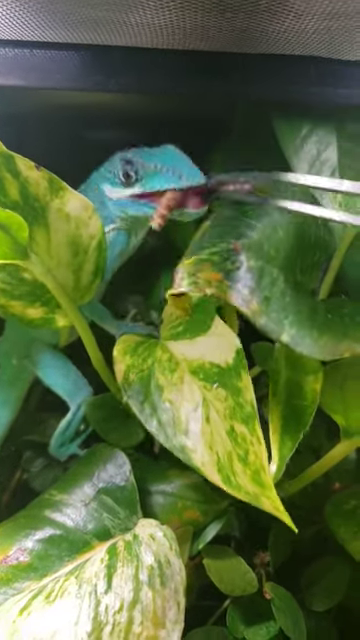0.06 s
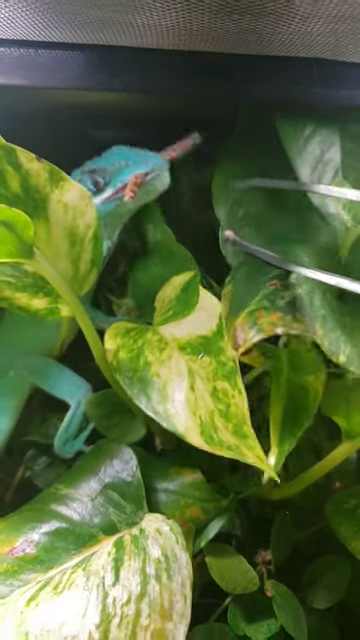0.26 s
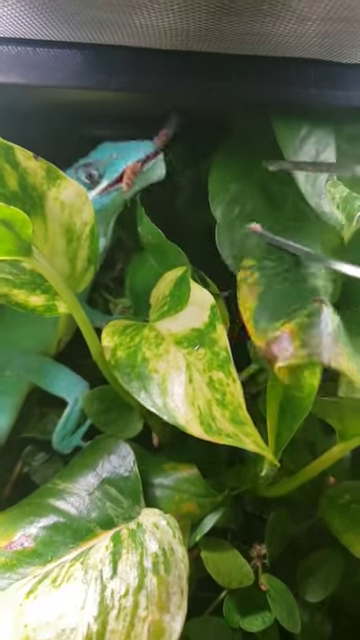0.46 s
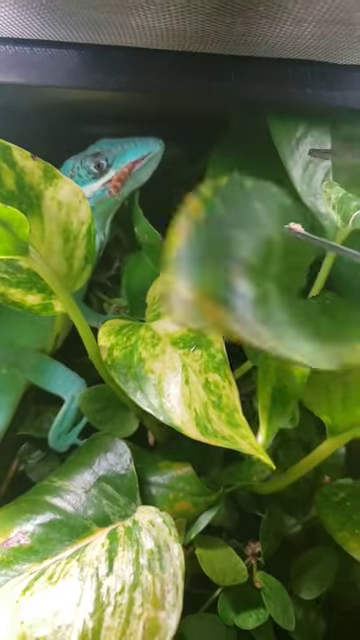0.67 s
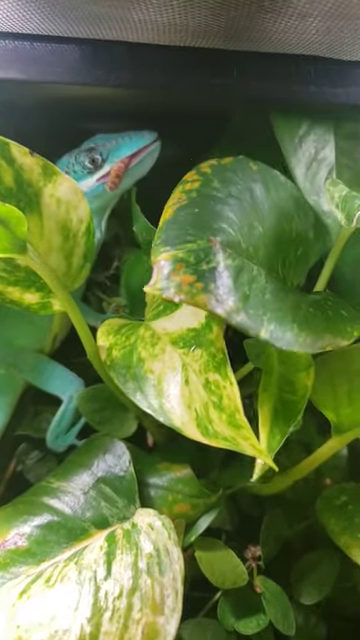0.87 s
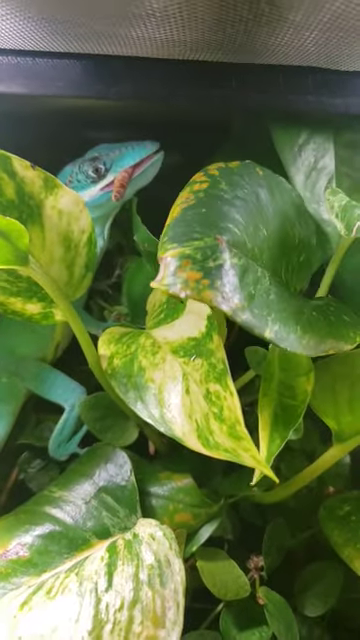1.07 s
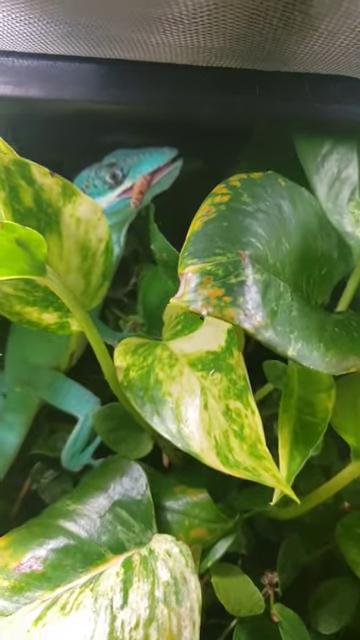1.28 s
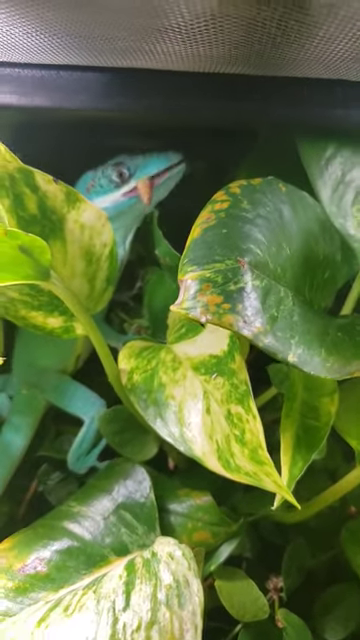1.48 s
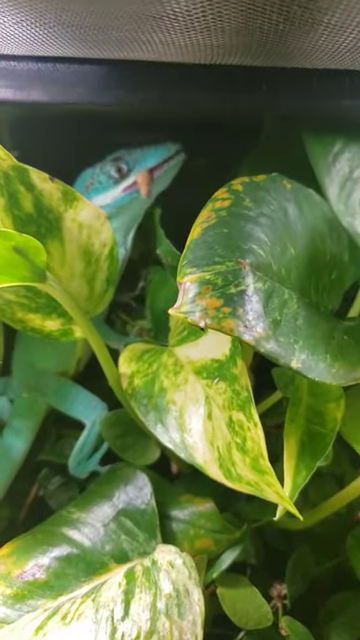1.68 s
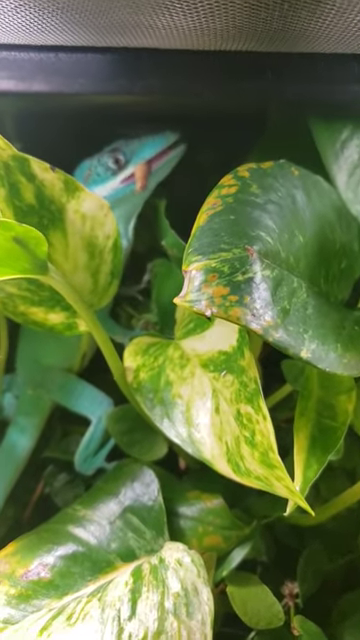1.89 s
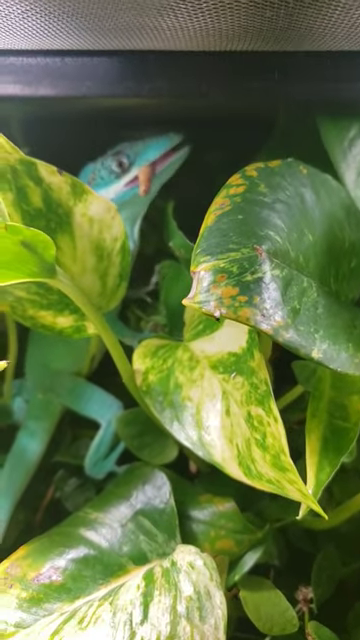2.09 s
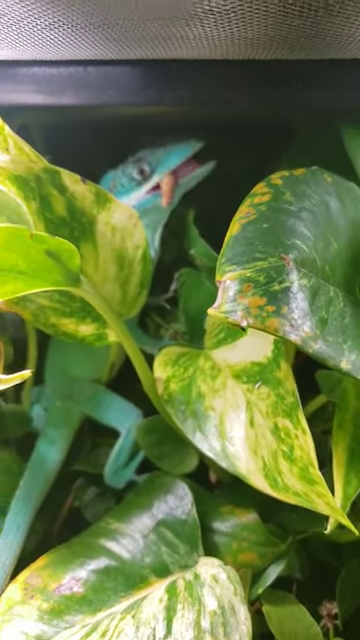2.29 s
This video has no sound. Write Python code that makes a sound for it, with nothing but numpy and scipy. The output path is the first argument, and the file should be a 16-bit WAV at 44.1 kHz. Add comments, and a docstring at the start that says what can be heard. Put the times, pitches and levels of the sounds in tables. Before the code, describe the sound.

Close leaves swish as tongs draw back through them, then thin to small crackles and snaps.

```python
"""At a glass enclosure in a faintly humming room, stereo microphones close to the leaves.
Metal tongs draw back through the foliage while a lizard takes its food. Leaf slides over leaf in
tiny slips that swish and fizz; bent leaves spring back with papery flicks. Sharp snaps and fine
crackle sound brighter on the right, and a few soft bumps swing a panel in the middle.
The glass walls add a quick flutter and a faint ring."""
import sys
import numpy as np
from scipy import signal
from scipy.fft import rfft, irfft
from scipy.io import wavfile
from scipy.ndimage import uniform_filter1d

SR = 44100
rng = np.random.default_rng(int(sys.argv[2]) if len(sys.argv) > 2 else 0)


def wrap_up_sound(samples):
    """Save the sound to the file named by the first command line argument, as 16-bit audio."""
    columns = np.atleast_2d(samples).T
    # keep every value between -1 and 1, then stretch to whole-number steps
    tamed = np.clip(columns, -1, 1)
    steps = np.round(tamed * 32767).astype(np.int16)
    wavfile.write(sys.argv[1], SR, steps)


N = 108045


def amp(db):
    return 10 ** (np.asarray(db) / 20)


def unit_rms(x):
    return x / np.sqrt(np.mean(x ** 2) + 1e-20)


def over_pitch(points, hz, column=1):
    """Reads a table along a log-frequency axis."""
    table = np.array(points, float)
    return np.interp(np.log(hz + 1), np.log(table[:, 0] + 1), table[:, column])


def over_time(points, column):
    table = np.array(points, float)
    return np.interp(np.arange(N) / SR, table[:, 0], table[:, column])


def colour(x, points):
    """Filters by a spectrum that falls away below its first point."""
    size = x.shape[-1]
    hz = np.fft.rfftfreq(size, 1 / SR)
    low_cut = np.minimum(hz / points[0][0], 1) ** 2
    return irfft(rfft(x) * amp(over_pitch(points, hz)) * low_cut, size)


def pan(db):
    """Constant-power gains for a balance: left microphone minus right, in dB."""
    gains = np.array([amp(db / 2), amp(-db / 2)]).reshape(2, -1)
    return gains / np.sqrt(np.mean(gains ** 2, axis=0))


def add(mix, start_s, sound):
    start = round(start_s * SR)
    sound = sound[:, max(-start, 0):]
    part = mix[:, max(start, 0):][:, :sound.shape[1]]
    part += sound[:, :part.shape[1]]


# Room tone behind the enclosure: (frequency [Hz], relative level [dB])
ROOM_SPECTRUM = [(20, -15), (40, -9.5), (60, 2), (85, -8), (130, -11), (190, -16), (255, -15.5),
                 (340, -19.5), (520, -20.5), (800, -24.5), (1400, -29), (3000, -33.5), (5500, -43.5),
                 (7000, -51), (8400, -42), (12500, -29.5), (14300, -30), (15550, -34), (15900, -72)]
# The room across the two microphones: (frequency [Hz], balance [dB], correlation [0-1])
ROOM_STEREO = [(58, 3, 0.6), (270, 2, 0.67), (700, 2.5, 0.3), (1970, 2, 0), (6730, -5, 0.1),
               (10700, 15.5, 0), (14400, -15, 0.11)]
# Wavering background hum: (pitch [Hz], level [dB], half width [Hz])
HUM_LINES = [(60.8, -75.5, 0.87), (110, -102.5, 6.2), (501, -88, 2.6), (779, -91.5, 12)]
# Faint swells in the background: (time [s], drone level [dB], rumble level [dB], hiss level [dB])
ROOM_SWELLS = [(0, -84, -94, -97), (.35, -85.5, -70.5, -74), (.48, -75.5, -74.5, -86),
               (.82, -81.5, -67, -91), (.95, -77, -104, -80), (1.12, -77.5, -73, -82),
               (1.25, -95, -88, -73), (1.6, -86, -68.5, -86), (2.2, -97, -80.5, -96), (2.33, -98, -89, -75),
               (2.45, -88, -94, -77)]


def room_tone():
    """Behind the leaves: steady air and hum, with a drone, rumble and hiss that come and go."""
    hz = np.fft.rfftfreq(N, 1 / SR)
    balance = pan(over_pitch(ROOM_STEREO, hz))
    correlation = over_pitch(ROOM_STEREO, hz, column=2)
    low_cut = np.minimum(hz / 52, 1) ** 2

    def stereo_noise(gain):
        left, independent = rfft(rng.standard_normal((2, N)))
        right = correlation * left + np.sqrt(1 - correlation ** 2) * independent
        return unit_rms(irfft(np.array([left, right]) * gain * low_cut * balance, N))

    def band(centre_hz, half_width_hz):
        return stereo_noise(1 / (1 + ((hz - centre_hz) / half_width_hz) ** 2))

    hum = sum(amp(db) * band(pitch_hz, half_width_hz) for pitch_hz, db, half_width_hz in HUM_LINES)
    drone = amp(over_time(ROOM_SWELLS, 1)) * band(centre_hz=251.5, half_width_hz=35)
    rumble = amp(over_time(ROOM_SWELLS, 2)) * band(centre_hz=62.4, half_width_hz=22)
    hiss = amp(over_time(ROOM_SWELLS, 3)) * band(centre_hz=14400, half_width_hz=820)
    air = amp(-71) * stereo_noise(amp(over_pitch(ROOM_SPECTRUM, hz)))
    return air + hum + drone + rumble + hiss


def slips(per_s, spread_db, decay_s):
    """A random train of tiny slips of uneven size, each a puff of noise."""
    onsets = rng.random(N) < per_s / SR
    sizes = amp(spread_db * np.minimum(rng.exponential(1, N), 4))
    power = signal.lfilter([1], [1, -np.exp(-1 / (decay_s * SR))], (onsets * sizes) ** 2)
    return np.sqrt(power) * rng.standard_normal((2, N))


def catch_and_slip(depth_db, step_s):
    """A gain that jumps as the leaves catch and slip in short clumps."""
    knots = np.arange(0, N, step_s * SR)
    jumps = rng.standard_normal(N)[:len(knots)]
    return amp(depth_db * np.interp(np.arange(N), knots, jumps))


def bending(x, depth_db):
    """Resonances drift as the leaves bend and touch in new places."""
    spectra = signal.stft(x, nperseg=256)[2]
    _, bins, frames = spectra.shape
    patches = rng.standard_normal((frames, bins))  # the same at both microphones
    patches = uniform_filter1d(patches, size=9, axis=0)
    patches = uniform_filter1d(patches, size=3, axis=1)
    return signal.istft(spectra * amp(depth_db * unit_rms(patches).T), nperseg=256)[1][:, :N]


# Leaves brushing, close up: (time [s], relative swish level [dB], relative fizz and crackle level [dB])
BRUSHING = [(0, -70.5, -57), (0.09, -70.5, -65), (0.104, -54, -48.5), (0.13, -71, -64.5), (0.158, -65, -58),
            (0.175, -68.5, -57), (0.226, -61.5, -54.5), (0.244, -52, -44), (0.268, -59.5, -54.5),
            (0.3, -60, -55), (0.325, -51.5, -46.5), (0.35, -56.5, -57.5), (0.375, -55, -47.5),
            (0.413, -76, -62), (0.43, -66, -52.5), (0.51, -73.5, -63), (0.555, -74.5, -61),
            (0.605, -59.5, -56), (0.648, -70, -64.5), (0.72, -59.5, -45), (0.75, -60, -51),
            (0.805, -68.5, -65.5), (0.838, -56, -50.5), (0.858, -69, -64), (0.895, -64, -62.5),
            (0.93, -67.5, -66), (0.96, -77, -67), (1.04, -72.5, -66.5), (1.13, -78.5, -67),
            (1.29, -81.5, -73.5), (1.39, -79.5, -70.5), (1.47, -71.5, -63), (1.61, -73.5, -64.5),
            (1.67, -80, -71.5), (1.765, -73, -63), (1.8, -76, -68.5), (1.96, -75, -69), (2.075, -85, -74),
            (2.09, -72, -58), (2.112, -68, -60), (2.135, -81, -74.5), (2.172, -52.5, -62),
            (2.186, -65.5, -85), (2.24, -77, -77), (2.28, -85.5, -77)]
# The brushing across the two microphones: (time [s], swish balance [dB], fizz balance [dB])
LEAF_BALANCE = [(0, 2, -17), (.3, 4.5, -1), (.53, 2.5, -11), (.61, 7, -5), (.72, 3.5, -1), (.93, 2, -6),
                (1.15, 5, -20), (1.6, 3, 1.5), (2.1, 1, -25), (2.3, 6, -8)]
# The broad swish, a little to the left: (frequency [Hz], relative level [dB])
SWISH_SPECTRUM = [(300, -11.5), (1100, -14), (2100, -10), (2900, -4), (3700, -4.5), (5000, -3), (7000, 3.5),
                  (8300, -5.5), (11000, -23)]
# The high fizz, mostly to the right: (frequency [Hz], relative level [dB])
FIZZ_SPECTRUM = [(3000, -47.5), (6000, -40.5), (8300, -20.5), (9800, -12), (11000, 1.5), (12200, -4.5),
                 (13300, -0.5), (14500, 0.5), (15300, -1.5), (15600, 0), (15900, -21.5)]
# Crackle and snap treble, with the right microphone's ringing emphasis:
# (frequency [Hz], relative level [dB])
CRISP_SPECTRUM = [(3000, -29), (6000, -29.5), (8200, -17), (9500, -5), (11000, -3), (11600, -3.5),
                  (12100, 5), (13400, -4), (14300, 6), (15300, -1.5), (15650, -10), (16000, -18),
                  (16500, -36)]


def brushing_leaves():
    """Leaf slides over leaf: dense slips make the swish and fizz, sparse ones the crackle."""
    rub = slips(per_s=5000, spread_db=3, decay_s=0.00068) * catch_and_slip(depth_db=2.5, step_s=0.006)
    ticks = slips(per_s=240, spread_db=2.5, decay_s=0.00023)
    swish = unit_rms(bending(colour(rub, SWISH_SPECTRUM), depth_db=4.5))
    swish *= amp(-0.5) * pan(over_time(LEAF_BALANCE, 1))
    fizz = unit_rms(bending(colour(rub, FIZZ_SPECTRUM), depth_db=4))
    fizz *= amp(-4) * pan(over_time(LEAF_BALANCE, 2))
    crackle = amp(-3.5) * pan(-12) * unit_rms(colour(ticks, CRISP_SPECTRUM))
    return amp(over_time(BRUSHING, 1)) * swish + amp(over_time(BRUSHING, 2)) * (fizz + crackle)


def tearing_fibre(spectrum, rise_s, lead_samples):
    """A millisecond or so of tearing fibre at each microphone, never twice quite the same colour."""
    age = np.maximum(np.arange(512) - lead_samples, 0) / SR / rise_s
    envelope = age * np.exp(-age)
    noise_spectrum = rfft(rng.standard_normal((2, 512)) * envelope)
    flat_burst = irfft(noise_spectrum / (abs(noise_spectrum) + 1e-9))
    varied_spectrum = [(hz, db + 2 * rng.standard_normal()) for hz, db in spectrum]
    burst = colour(flat_burst * np.sqrt(envelope), varied_spectrum)
    energy = np.sum(burst ** 2, axis=1, keepdims=True)
    return burst * np.sqrt(0.0025 * SR / energy)  # the energy of 2.5 ms at an rms of one


# Sharp snaps: (time [s], relative treble level [dB], relative body level [dB], treble balance [dB])
SHARP_SNAPS = [(0.0178, -44.5, -70, -34), (0.024, -63, -54.5, -10), (0.0375, -50, -63, -23),
               (0.0456, -44.5, -56.5, -10), (0.066, -51, -59, -10), (0.075, -46.5, -61, -8),
               (0.1046, -38, -56, -16), (0.166, -52, -72, -20), (0.1725, -41.5, -57, -10),
               (0.185, -46.5, -57, -10), (0.1987, -49, -66, -13), (0.2318, -19, -41, -11.5),
               (0.3075, -36, -44, -11), (0.329, -46, -56, -17), (0.362, -50, -53, -6),
               (0.378, -52, -70, -2), (0.3954, -54, -76, -11), (0.4016, -43, -64, -16),
               (0.419, -38.5, -65, -7), (0.4242, -47, -77, -12), (0.4406, -53, -70, -12),
               (0.4672, -43, -59, -27), (0.483, -56, -68, -17), (0.504, -51, -71, -4),
               (0.522, -51.5, -75, -15), (0.535, -49, -73, -17), (0.5445, -51, -83, -23),
               (0.5584, -52, -76, -28), (0.5642, -48.5, -60, -13), (0.5778, -42, -56, -17),
               (0.6267, -52, -63, -13), (0.645, -62, -74, -10), (0.6648, -39.5, -60, -27),
               (0.7146, -47, -47, 4), (0.742, -33, -47, -10), (0.761, -54, -67, -9), (0.7757, -49, -58, -5),
               (0.8381, -47, -49.5, -18), (0.8725, -51, -51, -10), (0.8931, -58, -59, 2),
               (0.928, -53.5, -56, -8), (0.9436, -63, -69, -18), (0.9688, -52, -60.5, -35),
               (1.012, -54, -73, -22), (1.0292, -51.5, -60, -7), (1.0567, -58.5, -59, 4),
               (1.103, -50, -71, -27), (1.1237, -53, -83, -17), (1.228, -51.5, -69.5, -30),
               (1.3142, -59, -67.5, -1), (1.375, -49, -70, -37), (1.4117, -45, -59.5, -24),
               (1.433, -54, -66, -21), (1.443, -51.5, -66, -23), (1.4593, -46.5, -59, -39),
               (1.4707, -49.5, -64, -13), (1.479, -57, -73, -22), (1.5084, -51, -59.5, -14),
               (1.5458, -48, -55, -10), (1.5755, -53, -67, -15), (1.5852, -41.5, -50, -7),
               (1.6048, -51.5, -56.5, -19), (1.6854, -49, -71, -33), (1.7116, -51.5, -84, -25),
               (1.729, -53, -56.5, -26), (1.7526, -35, -49.5, -13), (1.7707, -49, -60, -16),
               (1.815, -49.5, -56, -6), (1.8555, -49.5, -72, -13), (1.888, -53, -63.5, -15),
               (1.9588, -49, -62.5, -34), (1.9987, -52.5, -84, -40.5), (2.1495, -21, -40.5, -13.5),
               (2.1701, -36.5, -49.5, -15), (2.1747, -36.5, -50, -9), (2.223, -47, -61, -4)]
# A snap's duller body: (frequency [Hz], relative level [dB])
BODY_SPECTRUM = [(150, 0), (900, -12), (1800, -15.5), (2900, -16.5), (3700, -10), (5000, 2), (6800, 9.5),
                 (8200, 4.5), (11000, -29.5)]


def snaps():
    """Fibres snap: a crisp top, mostly louder on the right, and a duller body near the middle."""
    out, lead_samples = np.zeros((2, N)), 128
    for time_s, treble_db, body_db, balance_db in SHARP_SNAPS:
        rise_s = 0.00049 * 2 ** ((treble_db + 45.5) / 59.5)  # louder snaps last longer
        treble = amp(treble_db - 0.5) * tearing_fibre(CRISP_SPECTRUM, rise_s, lead_samples)
        body = amp(body_db - 1.5) * tearing_fibre(BODY_SPECTRUM, rise_s * 1.42, lead_samples)
        add(out, time_s - lead_samples / SR, pan(balance_db) * treble + pan(2.5) * body)
    return out


# Papery leaves and stems coming free, left of centre:
# (peak time [s], pitch [Hz], half width [Hz], relative level [dB], half length [s])
LEAF_FLICKS = [(0.1, 4700, 900, -55, 0.003), (.233, 4460, 1100, -46.5, 0.0018),
               (0.244, 2720, 694, -58, 0.0056), (0.323, 2980, 253, -45.5, 0.003),
               (0.603, 6800, 1300, -54.5, 0.023), (0.713, 6100, 1550, -50, 0.03),
               (.826, 3500, 900, -59, 0.0025), (.838, 3330, 396, -48.5, 0.0037),
               (.839, 4700, 600, -51, 0.0033), (0.872, 3300, 500, -61.5, 0.0087),
               (0.99, 6800, 795, -60, 0.0066), (1.031, 4760, 1840, -50, 0.00082),
               (1.315, 4200, 1200, -65.5, 0.0026), (1.374, 4240, 1200, -67, .0012),
               (1.545, 4160, 1300, -56.5, 0.0011), (1.733, 4260, 1300, -62, .0014),
               (1.816, 3840, 1090, -57, .0018), (2.159, 6600, 302, -48, 0.0047),
               (2.173, 2670, 200, -59, 0.0045), (2.174, 6560, 500, -54, .003)]


def leaf_flicks():
    """A bent leaf flicks or slides free: a short swell of friction rings in one broad resonance."""
    out, size = np.zeros((2, N)), SR // 4
    t, hz = (np.arange(size) - size // 2) / SR, np.fft.rfftfreq(size, 1 / SR)
    for peak_s, pitch_hz, half_width_hz, db, half_length_s in LEAF_FLICKS:
        resonance = 1 / (1 + ((hz - pitch_hz) / half_width_hz) ** 4)
        ring = irfft(rfft(rng.standard_normal((2, size))) * resonance, size)
        swell = np.exp(-0.5 * (t / half_length_s) ** 2)
        flick = unit_rms(ring * swell) * np.sqrt(np.mean(swell ** 2))
        add(out, peak_s + t[0], amp(db - 6) * pan(5.5) * flick)
    return out


# Soft bumps, midway between the microphones:
# (time [s], relative level [dB], pitch [Hz], attack [s], decay [s])
PANEL_BUMPS = [(1.3792, -61.5, 298, 0.00054, 0.0019), (1.381, -54.5, 59, 0.053, 0.036),
               (1.4242, -54.5, 150, .003, 0.0038), (1.459, -67, 218, .003, 0.0068),
               (1.5122, -50.5, 144, 0.00017, 0.0034), (1.589, -55.5, 130, .0003, 0.0008)]


def panel_bumps():
    """Each push makes a panel of the enclosure swing and die away within a few cycles."""
    out, t = np.zeros((2, N)), np.arange(SR // 4) / SR
    low_pass = signal.butter(4, 1230, fs=SR, output="sos")
    for time_s, db, pitch_hz, attack_s, decay_s in PANEL_BUMPS:
        envelope = np.minimum(t / attack_s, 1) * np.exp(-np.maximum(t - attack_s, 0) / decay_s)
        swing = np.cos(2 * np.pi * pitch_hz * t) * envelope
        side = 0.88 * signal.hilbert(swing).imag  # shifts the phase between left and right
        add(out, time_s, amp(db) * signal.sosfilt(low_pass, [swing + side, swing - side]))
    return out


# Inside the glass, the flutter, far-wall echo and longer ring: (delay [s], t60 [s], level [dB])
GLASS_ECHOES = [(0.001, 0.021, -6), (.0105, 0.015, -23), (0.0046, 0.41, -27)]


def glass_walls(direct, crossfeed=0.084):
    """The glass walls throw back a quick flutter and a faint ring, partly from the other side."""
    t, out = np.arange(SR // 3) / SR, direct.copy()
    at_walls = direct + crossfeed * direct[::-1]
    for delay_s, t60_s, db in GLASS_ECHOES:
        tail = rng.standard_normal((2, len(t))) * (t > delay_s) * np.exp(-np.log(1000) * t / t60_s)
        tail /= np.linalg.norm(tail, axis=1, keepdims=True)
        out += amp(db) * signal.fftconvolve(at_walls, tail, axes=1)[:, :N]
    return out


def scene():
    """Foliage close up inside the glass, bumps on its panels and the room behind."""
    foliage = snaps() + brushing_leaves() + leaf_flicks()
    return glass_walls(foliage) + panel_bumps() + room_tone()


def record(dry):
    """The recorder's band ends at 16.5 kHz."""
    low_pass = signal.firwin(255, 16500, window=("kaiser", 9), fs=SR)
    return signal.oaconvolve(dry, low_pass[None], "same", axes=1)


dry = scene()
out = record(dry)
wrap_up_sound(out)
```